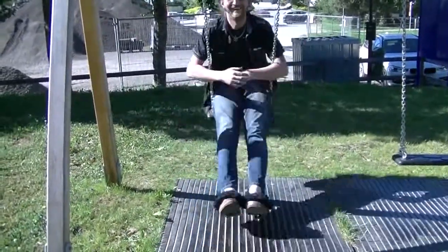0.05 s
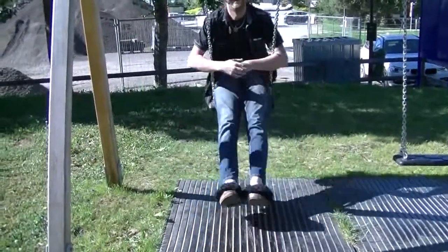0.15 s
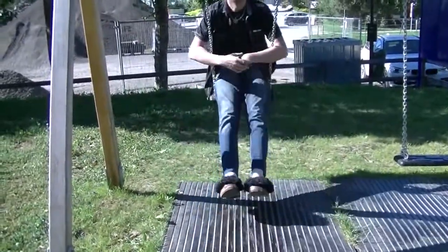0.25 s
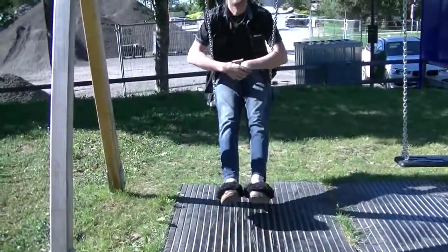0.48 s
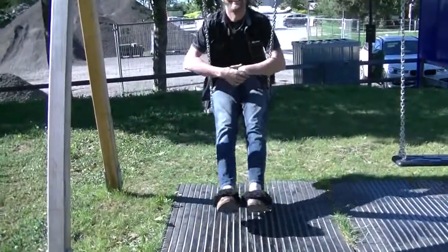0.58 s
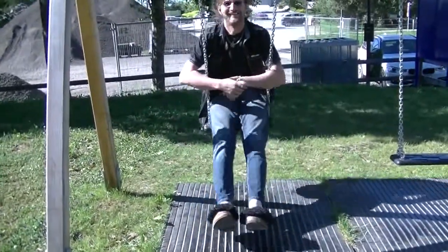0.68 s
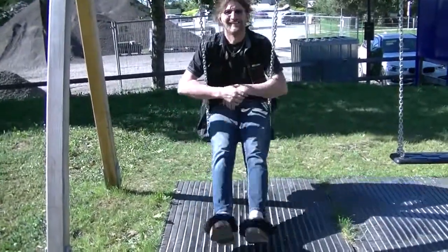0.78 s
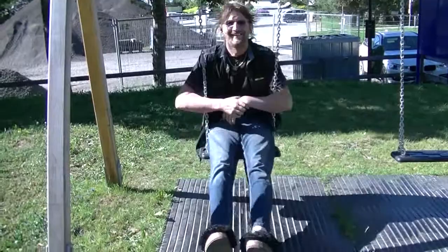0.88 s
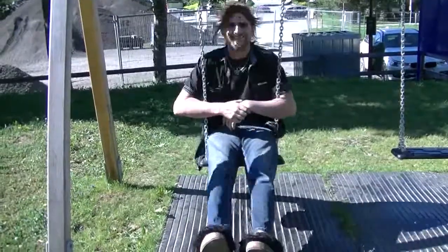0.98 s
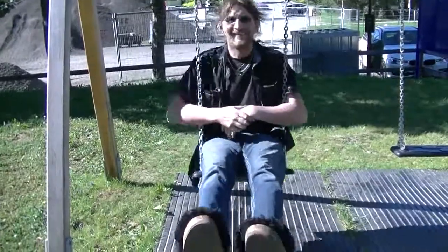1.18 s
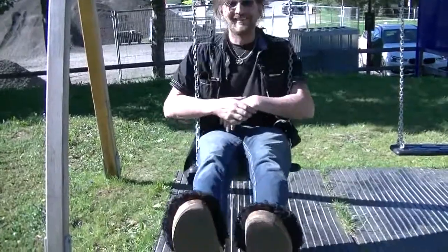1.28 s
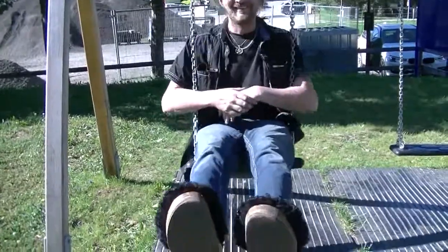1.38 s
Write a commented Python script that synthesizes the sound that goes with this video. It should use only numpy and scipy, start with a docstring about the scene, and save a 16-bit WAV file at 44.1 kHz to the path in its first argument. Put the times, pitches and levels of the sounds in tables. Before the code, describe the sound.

Outdoors, a moving swing's chains click and scrape close by, loudest at first, with dull bumps on the microphone. One more sharp click leaves a thin ring, then a faint squeak, while distant traffic and leaves hush underneath.

```python
"""Outdoors, in a steady hush of distant traffic and leaves. Dry, very close clicks and scrapes, likely the
camera's housing or strap being handled; each click is a burst of chatter ringing heavily damped modes.
Soft low handling bumps and a rumble come with them. A faint, thin ring follows one click, then a faint
high squeak. The loudest clicks push the gain control down for a moment."""
import sys
import numpy as np
from scipy import signal
from scipy.fft import rfft, irfft, next_fast_len
from scipy.io import wavfile
from scipy.ndimage import uniform_filter1d, map_coordinates

SR = 44100
rng = np.random.default_rng(int(sys.argv[2]) if len(sys.argv) > 2 else 0)


def file_out(sig):
    """Save sig as 16-bit WAV at sys.argv[1]."""
    # one column per channel
    cols = np.atleast_2d(sig).T
    # limit, then scale
    lim = np.clip(cols, -1, 1)
    pcm = np.round(lim * 32767).astype(np.int16)
    wavfile.write(sys.argv[1], SR, pcm)


N = 63945


def amp(db):
    """Decibels to gain."""
    return 10 ** (np.asarray(db) / 20)


def curve_at(points, hz):
    """Read a curve of (frequency, value) points along a log frequency axis."""
    freqs, values = np.transpose(points)
    return np.interp(np.log(hz + 1), np.log(freqs + 1), values)


def unit_rms(x):
    """Scale to rms 1."""
    return x / np.sqrt(np.mean(x ** 2) + 1e-20)


def wobble(rate):
    """A smooth random curve with `rate` knots a second."""
    knots = rng.standard_normal(int(N * rate / SR) + 4)
    return map_coordinates(knots, [np.arange(N) * rate / SR])


def spread(spectra, correlation, hz):
    """Mix two unrelated spectra as mid and side to get a given left-right correlation."""
    angle = np.arccos(np.clip(curve_at(correlation, hz), -1, 1)) / 2
    mid, side = spectra[0] * np.cos(angle), spectra[1] * np.sin(angle)
    return np.array([mid + side, mid - side])


def noise(eq, correlation):
    """Stereo noise of rms 1, shaped by an EQ curve and a left-right correlation curve."""
    size = next_fast_len(N)
    hz = np.fft.rfftfreq(size, 1 / SR)
    spectra = rfft(rng.standard_normal((2, size))) * amp(curve_at(eq, hz))
    return unit_rms(irfft(spread(spectra, correlation, hz), size)[:, :N])


def attack_decay(start, attack, t60):
    """An envelope that rises from `start` and dies away exponentially; all in seconds."""
    t = np.maximum(np.arange(N) / SR - start, 0)
    return (1 - np.exp(-t / attack)) * amp(-60 * t / t60)


def low_cut(x, hz):
    """High-pass at 12 dB an octave."""
    return signal.sosfilt(signal.butter(2, hz, "high", fs=SR, output="sos"), x)


def minimum_phase(gain):
    """The filter response with this gain and no pre-ring."""
    cepstrum = irfft(np.log(np.maximum(gain, 1e-6)))
    half = len(cepstrum) // 2
    cepstrum[1:half] *= 2
    cepstrum[half + 1:] = 0
    return np.exp(rfft(cepstrum))


# Tone of the outdoor bed (frequency [Hz], relative level [dB])
HUSH_EQ = [(25, -5), (74, -2), (120, -1.5), (326, -4), (394, -2), (775, -5.5), (1330, -13.5), (2160, -7.5),
           (4370, -7), (5280, -12.5), (8590, -17.5), (9570, -22), (16000, -32)]
# Stereo image of the bed and the faint rings (frequency [Hz], left-right correlation [-1..1])
OUTDOOR_IMAGE = [(60, 0.21), (180, 0.73), (1000, 0.94), (4970, 0.69), (15000, 0.14)]
def outdoor_hush(level_db=-48, drift_db=0.71):
    """Distant traffic and leaves: a nearly steady bed with little deep bass."""
    bed = low_cut(noise(HUSH_EQ, OUTDOOR_IMAGE), hz=100)
    return amp(level_db + drift_db * wobble(rate=3.81)) * bed


# Fader ride of the rumble (time [s], level [dB])
RUMBLE_RIDE = [(0.0, -57), (0.4, -65), (0.648, -56.5), (0.822, -54), (0.958, -56.5), (1.4, -66)]
# Tone of the rumble (frequency [Hz], relative level [dB])
RUMBLE_EQ = [(20, -22), (45, -2), (100, 1), (180, -1.5), (300, -17), (700, -41)]
def air_rumble(sway_db=2.5):
    """Air and handling on the camera make a low, uneven rumble."""
    ride_db = np.interp(np.arange(N) / SR, *np.transpose(RUMBLE_RIDE))
    return amp(ride_db + sway_db * wobble(rate=24.0)) * noise(RUMBLE_EQ, correlation=[(100, 0.84)])


# Ring and squeak cues (time [s], level [dB], pitch [Hz], attack [s], decay T60 [s])
RING_CUES = [(.776, -44, 3350, .014, .22), (.92, -49.5, 4300, .035, .9)]
def faint_rings(half_width_hz=170):
    """A faint, thin ring after a click, then a faint high squeak: narrow bands of noise."""
    out = np.zeros((2, N))
    for start, db, hz, attack, t60 in RING_CUES:
        band = [(hz + k * half_width_hz, -10 * k * k) for k in range(-3, 4)]
        out += amp(db) * attack_decay(start, attack, t60) * noise(band, OUTDOOR_IMAGE)
    return out


# Handling bump cues (time [s], level [dB], pitch [Hz])
BUMP_CUES = [(0.244, -33, 97), (0.262, -25.5, 72), (0.334, -29, 95), (0.464, -31, 157.5),
             (0.5202, -30.5, 194), (0.531, -31.5, 122), (0.663, -34, 110), (0.711, -34, 130),
             (0.7289, -25, 131), (0.745, -26.5, 141), (0.761, -22, 110.7), (0.854, -37.5, 110),
             (.872, -27, 119), (0.934, -39, 85), (1.088, -37.5, 102)]
# Tone of the thud under each bump (frequency [Hz], relative level [dB])
THUD_EQ = [(25, -48), (70, 2.5), (260, 1.5), (450, -23), (1000, -23), (3000, -41)]
def handling_bumps(attack_s=0.0014, knock_ratio=2.2, knock_db=-10, thud_db=-10):
    """Each bump is a low push of a cycle or two, a hollow knock of the camera body and a dull thud."""
    t = np.arange(N) / SR
    tones, thud_envelope = np.zeros(N), np.zeros(N)
    for start, db, hz in BUMP_CUES:
        phase = 2 * np.pi * hz * (t - start)
        push, knock = np.sin(phase), amp(knock_db) * np.sin(knock_ratio * phase)
        tones += amp(db) * attack_decay(start, attack_s, t60=0.036) * (push + knock)
        thud_envelope += amp(db + thud_db) * attack_decay(start, attack_s, t60=0.05)
    thuds = thud_envelope * noise(THUD_EQ, correlation=[(100, 0.81)])
    return low_cut(tones + thuds, hz=52)


# Scrape and fuzz cues (time [s], level [dB], decay T60 [s])
SCRAPE_CUES = [(0.2202, -21, 0.04), (0.238, -29, 0.026), (0.252, -29, 0.071), (0.351, -31.5, 0.037),
               (0.7597, -31, 0.021), (0.772, -48.5, 0.22), (0.876, -49, 0.028), (1.1862, -34, 0.16)]
# Tone of the scrapes and fuzz (frequency [Hz], relative level [dB])
SCRAPE_EQ = [(200, -18), (1300, -13.5), (1800, -1), (4400, 2.5), (6000, -4.5), (8500, -10.5),
             (11000, -16.5), (16000, -30)]
def scrapes_and_fuzz(attack_s=0.00075, grain_db=0.5):
    """Short, grainy handling scrapes; at 0.76 s a brief, soft fuzz of noise swells just before a click."""
    envelope = sum(amp(db) * attack_decay(start, attack_s, t60) for start, db, t60 in SCRAPE_CUES)
    hiss = noise(SCRAPE_EQ, correlation=[(2500, 0.89), (8000, 0.16)])
    grain = amp(grain_db * wobble(rate=560))
    return envelope * unit_rms(hiss * grain)


# Resonances the clicks ring (frequency [Hz], width [Hz], level [dB])
BODY_MODES = [(737, 92, -5.5), (1493, 140, -0.5), (1980, 610, -2.5), (2640, 700, 0), (3302, 314, 5),
              (4140, 1000, 1.5), (5075, 820, 2.5), (5770, 2800, -4), (7810, 1570, 2), (8850, 580, 1),
              (10270, 1100, -13), (11630, 1800, -14), (14300, 2000, -22)]
# Broadband fill between the resonances (frequency [Hz], level [dB])
BODY_FILL = [(60, -24.5), (400, -10.5), (1000, -16), (6500, -10), (9000, -17), (11000, -27), (16000, -55)]
def click_body(hz):
    """Gain curve shared by all clicks: heavily damped modes over a broad floor."""
    mode_power = sum(amp(db) ** 2 / (1 + ((hz - centre) / (width / 2)) ** 2) ** 2
                     for centre, width, db in BODY_MODES)
    return np.sqrt(mode_power + amp(curve_at(BODY_FILL, hz)) ** 2)


# Stereo image of the chatter (frequency [Hz], left-right correlation [-1..1])
CHATTER_IMAGE = [(3300, 0.91), (4300, 0.78), (6000, -0.17), (8000, 0.55), (12000, -0.48)]
def contact_strike(t, hz, hold_s, chatter_t60_s=0.0082, tail_db=-19, tail_t60_s=0.023, snap_gain=0.38):
    """Stereo spectrum of one strike: a sharp centred snap and a burst of chatter with a faint tail."""
    burst = amp(-60 * np.maximum(t - hold_s, 0) / chatter_t60_s)
    envelope = burst + amp(tail_db - 60 * t / tail_t60_s)
    chatter = rng.standard_normal((2, len(t))) * envelope / np.linalg.norm(envelope)
    snap = snap_gain * np.clip(curve_at(CHATTER_IMAGE, hz), 0, 1)
    return spread(rfft(chatter), CHATTER_IMAGE, hz) + snap


def click_eq(hz, ring_hz, ring_db, bass_db, treble_db, sparkle_db, ring_octaves=0.14):
    """Gain curve that voices one click: a narrow ringing bell and three shelves."""
    ring = ring_db * np.exp(-0.5 * (np.log2((hz + 1) / ring_hz) / ring_octaves) ** 2)
    bass = bass_db / (1 + (hz / 1800) ** 4)
    treble = treble_db * (1 - 1 / (1 + (hz / 6500) ** 6))
    sparkle = sparkle_db * (1 - 1 / (1 + (hz / 10900) ** 10))
    return amp(ring + bass + treble + sparkle)


# Treble imbalance between the microphone ports (frequency [Hz], left minus right [dB])
PORT_BALANCE = [(3000, 1.5), (4200, 0), (5200, -4), (6500, 1), (8000, 7), (9200, 2), (11000, 4)]
# Click cues (time [s], level [dB], chatter hold [s], rebound delay [s], ring pitch [Hz],
# ring gain [dB], bass [dB], treble [dB], sparkle [dB], pan to the left [dB])
CLICK_CUES = [(0.1938, -36, 0.0003, 0.00041, 2860, 6, -18, -22, 2, 0),
              (0.2217, -42, 0.0016, 0.00033, 3260, -9, -6, 11, -7, 16),
              (0.225, -15, 0.00052, .00121, 4890, 8.5, -1.5, 9, -2.5, -1.5),
              (0.26, -11.5, 0.00077, 0.00051, 6170, 6.5, -8.5, 5, -1, 0.7),
              (0.335, -36, 0.00029, 0.0008, 1240, -3, 20.5, -31, 0, -0.5),
              (0.3406, -25, 0.00067, 0.0007, 4530, 11.5, -1.5, -3, 4, -1),
              (0.3954, -29.5, 0.0011, 0.000934, 5250, 5, -46, -7.5, 12, -2),
              (0.4666, -30, 0.00036, 0.00076, 1330, -2.5, 13.5, -29, -2, 1),
              (0.469, -24.5, 0.00089, 0.000935, 3250, 1, -6.5, 1.5, -2, 0.2),
              (0.5315, -41.5, 0.0011, 0.00084, 1130, 1, 26, -16, 0, 1),
              (0.5554, -36, 0.0017, .0009, 4350, 5, -6, -10.5, -4, 0.5),
              (0.7622, -19.5, .0007, .0015, 3180, 8.5, 1.5, -6, -2, -0.8),
              (.8358, -40, .0006, .00045, 2300, 11, 3, -12, 0, 1),
              (0.842, -40, 0.0013, 0.00049, 3900, 2, 3.5, -15, -9, 1)]
def handling_clicks(size=4096, rebound_gain=0.33, level_span_s=0.005):
    """Likely the camera's housing or strap: each snap chatters, rebounds at once and rings briefly."""
    out = np.zeros((2, N))
    t, hz = np.arange(size) / SR, np.fft.rfftfreq(size, 1 / SR)
    body = click_body(hz)
    ports = np.array([minimum_phase(amp(side * curve_at(PORT_BALANCE, hz) / 2)) for side in (1, -1)])
    taper = np.cos(np.pi / 2 * t / t[-1]) ** 2
    for start, db, hold_s, rebound_s, *voicing, pan_db in CLICK_CUES:
        strike = contact_strike(t, hz, hold_s)
        # Flatten the strike's broad colour so that the body and EQ set the tone.
        strike_power = np.mean(np.abs(strike) ** 2, axis=0)
        strike_colour = np.sqrt(np.abs(uniform_filter1d(strike_power, size=32)))
        resonance = minimum_phase(body * click_eq(hz, *voicing) / strike_colour)
        rebound = 1 + rebound_gain * np.exp(-2j * np.pi * hz * rebound_s)
        click = taper * irfft(strike * rebound * ports * resonance)
        # Give each side the energy of rms 1 over the level span, then set level and pan.
        click *= np.sqrt(level_span_s * SR / np.sum(click ** 2, axis=1, keepdims=True))
        click *= amp([[db + pan_db / 2], [db - pan_db / 2]])
        onset = round(start * SR)
        out[:, onset:onset + size] += click[:, :N - onset]
    return out


def scene():
    """Close, dry clicks, scrapes and faint rings over the bumps and the open-air bed."""
    foreground = handling_clicks() + scrapes_and_fuzz() + faint_rings()
    return foreground + handling_bumps() + air_rumble() + outdoor_hush()


def record(dry, threshold_db=-19, slope=0.39, attack_s=0.00086, hold_s=0.03, release_s=0.098):
    """Gain control ducks just after loud peaks, holds and recovers; a steep high cut follows."""
    power = np.abs(uniform_filter1d(np.mean(dry ** 2, axis=0), size=128))
    depth_db = slope * np.maximum(10 * np.log10(power + 1e-12) - threshold_db, 0)
    duck_db = np.zeros(N)
    for peak in signal.find_peaks(depth_db)[0]:
        t = np.arange(N - peak) / SR
        dip = (1 - np.exp(-t / attack_s)) * np.exp(-np.maximum(t - hold_s, 0) / release_s)
        duck_db[peak:] = np.maximum(duck_db[peak:], depth_db[peak] * dip)
    size = next_fast_len(N + SR // 2)
    high_cut = 1 / (1 + (np.fft.rfftfreq(size, 1 / SR) / 16000) ** 120)
    return irfft(rfft(dry * amp(-duck_db), size) * high_cut, size)[:, :N]


dry = scene()
out = record(dry)
file_out(out)
```